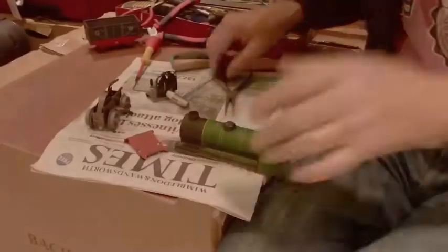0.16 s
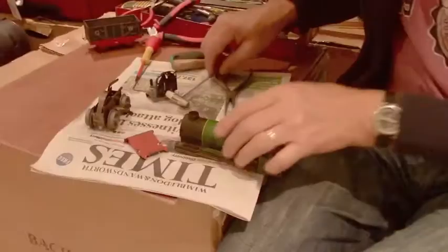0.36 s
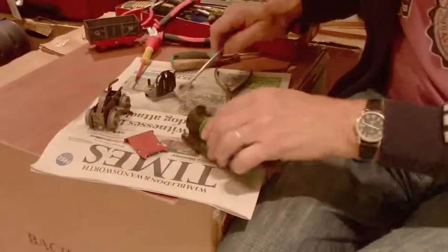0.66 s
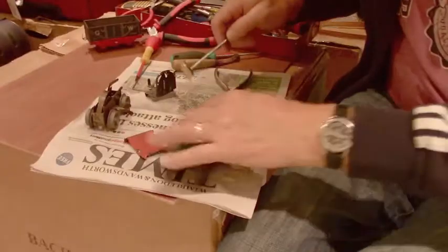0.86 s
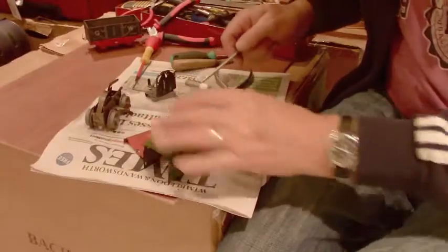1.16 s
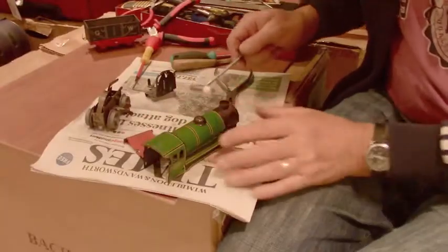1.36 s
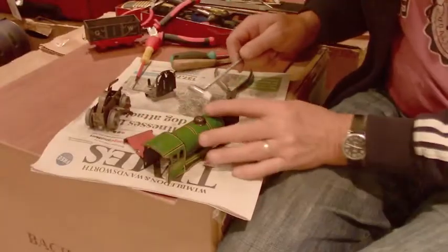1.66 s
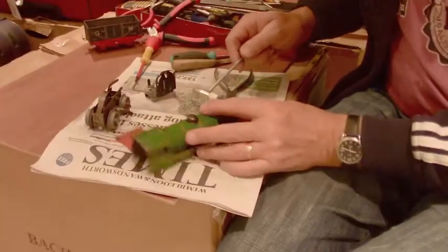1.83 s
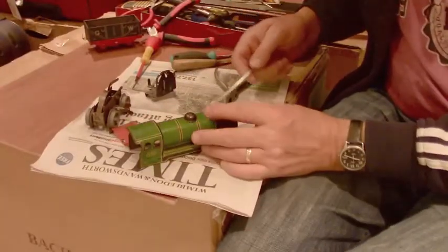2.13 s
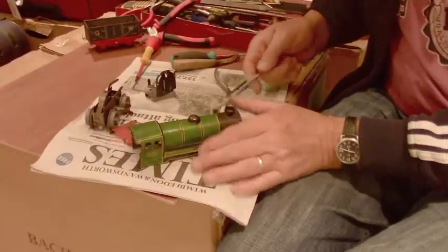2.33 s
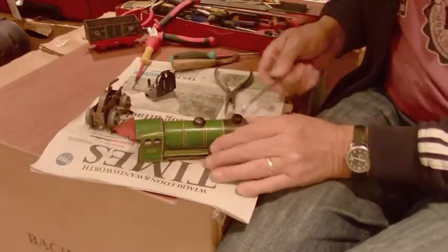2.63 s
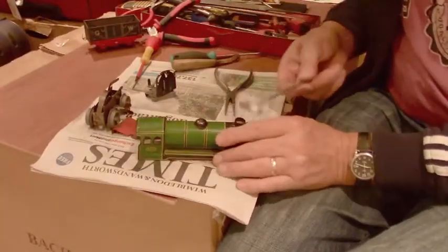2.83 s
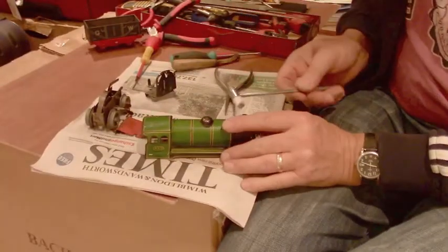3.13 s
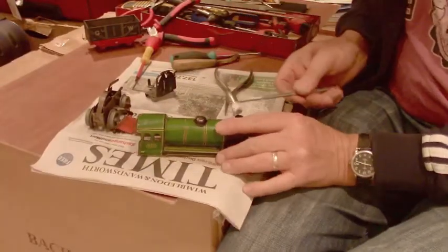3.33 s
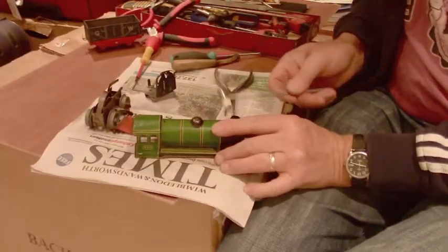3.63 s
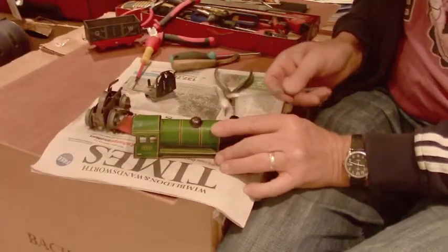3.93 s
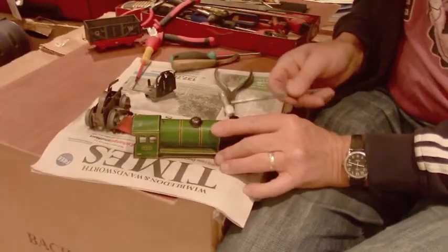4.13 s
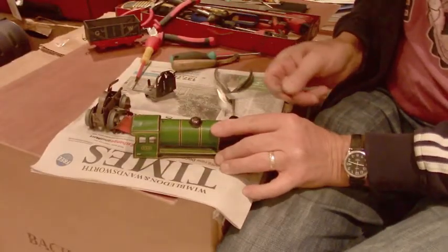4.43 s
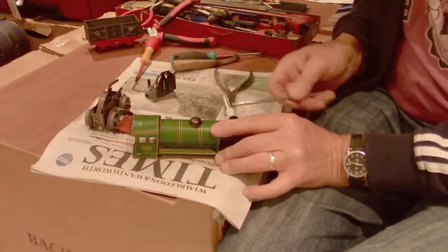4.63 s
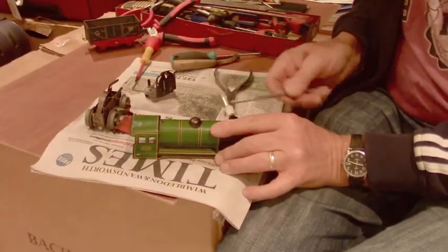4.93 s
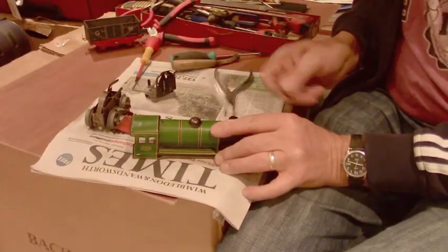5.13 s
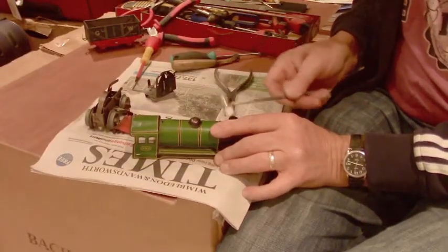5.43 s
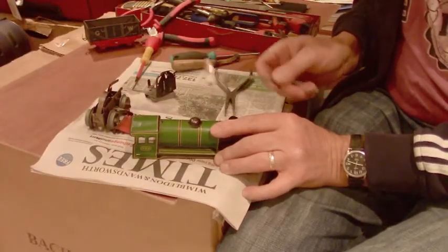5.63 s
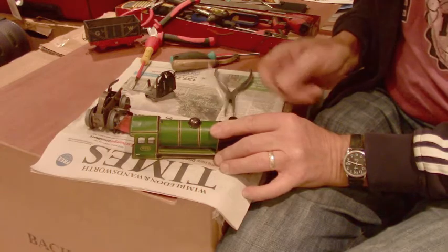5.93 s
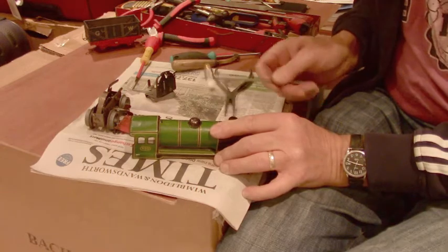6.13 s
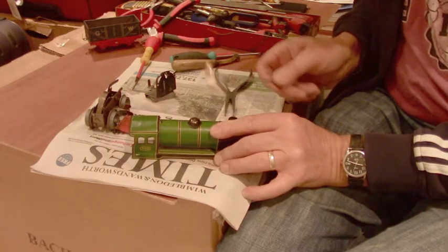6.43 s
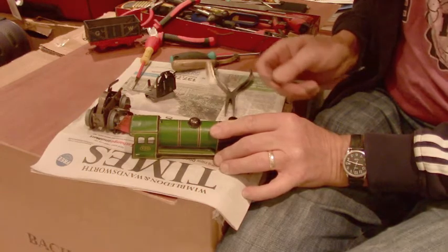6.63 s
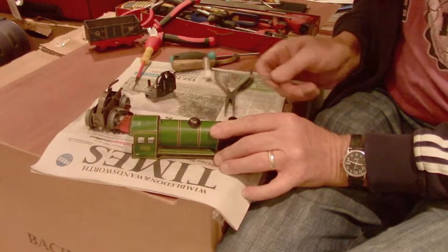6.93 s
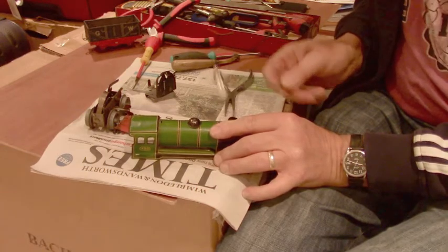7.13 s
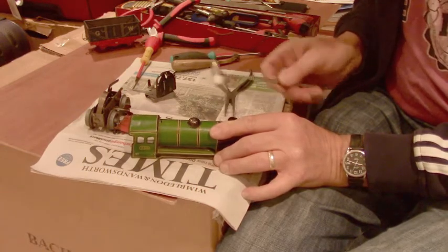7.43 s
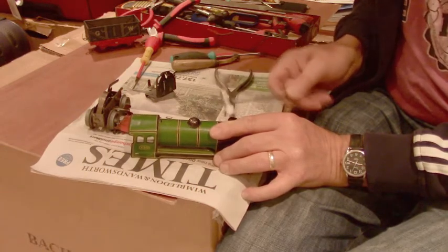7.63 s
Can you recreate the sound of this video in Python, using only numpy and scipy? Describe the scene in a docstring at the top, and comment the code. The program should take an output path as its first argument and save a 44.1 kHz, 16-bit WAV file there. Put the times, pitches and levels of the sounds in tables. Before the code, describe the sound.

Close up in a small, slightly echoing room, light metal clicks and short scrapes come from a tin toy being moved into place on newspaper. Then a small steel tool starts tapping it steadily, nearly four times a second, softly at first and then harder. The sharp taps ring briefly and thump the cardboard box underneath, with a few clanks from the toy and a low room noise behind.

```python
"""A dull room noise swells in, then light clicks and scrapes: a tin-plate toy locomotive is shifted,
turned and set down on a newspaper-covered cardboard box. A small steel tool rings faintly as it is
gripped, then taps the toy evenly, growing firmer. Each tap is a bright crack of the tin over a thump
of the box; now and then the toy drops back with a clank. A small, live room answers.
The sound is close and nearly the same in both channels, with the right one in opposite polarity."""
import sys
import numpy as np
from scipy import signal
from scipy.fft import rfft, irfft, next_fast_len
from scipy.io import wavfile
from scipy.ndimage import map_coordinates

SR = 44100
rng = np.random.default_rng(int(sys.argv[2]) if len(sys.argv) > 2 else 0)


def transcribe(u):
    """Save the signal u as a 16-bit wav file named by the first command-line argument.

    u: samples, shape (n,) or (channels, n), limited to [-1, 1]; the rate is SR.
    q: integer samples, one column per channel.
    """
    v = np.clip(np.atleast_2d(u).T, -1, 1)
    q = np.round(v * 32767).astype(np.int16)
    wavfile.write(sys.argv[1], SR, q)


N = 342657
HIT_TIME_S = np.arange(SR // 2) / SR  # time over the life of one hit


def amp(db):
    """Decibels to gain."""
    return 10 ** (np.asarray(db) / 20)


def unit(x):
    """x at rms 1."""
    return x / np.sqrt(np.mean(x ** 2) + 1e-20)


def along(points, hz):
    """Read a curve of (Hz, value) points on a log frequency axis."""
    freqs, values = np.transpose(points)
    return np.interp(np.log(hz + 1), np.log(freqs + 1), values)


def add(track, start_s, sound):
    """Mix a sound into a track."""
    part = track[round(start_s * SR):][:len(sound)]
    part += sound[:len(part)]


def filtered(x, response):
    """x times a response of frequency."""
    n = x.shape[-1]
    padded = next_fast_len(n + SR // 4)
    return irfft(rfft(x, padded) * response(np.fft.rfftfreq(padded, 1 / SR)), padded)[..., :n]


def low_cut(x, hz):
    """Roll off the bass below hz."""
    return signal.sosfilt(signal.butter(2, hz, "high", fs=SR, output="sos"), x)


def coloured(x, spectrum, bright_db=0, size=2048):
    """x through a minimum-phase EQ of unit energy, plus a treble shelf set by bright_db."""
    hz = np.fft.rfftfreq(size, 1 / SR)
    db = along(spectrum, hz)
    db -= 10 * np.log10(np.mean(amp(db) ** 2))
    db += bright_db * along([(3000, 0.1), (7000, 0.95)], hz)
    cepstrum = irfft(np.log(amp(db)))[:size // 2]
    cepstrum[1:] *= 2
    impulse_response = irfft(np.exp(rfft(cepstrum, size)))
    return signal.fftconvolve(x, impulse_response)[:len(x)]


# Tone of the room noise: freq_hz, level_db
ROOM_NOISE_EQ = [(20, -51), (50, -12), (105, -12), (170, -4.5), (260, -3), (335, -8), (450, -7.5),
                 (860, -8), (1100, -10), (1500, -22), (3000, -25.5), (5500, -28.5), (10000, -37.5),
                 (16000, -45)]
# Its fade-in: time_s, level_db
ROOM_NOISE_FADE = [(0, -50), (.04, -21.5), (.12, -6.5), (.25, 1.5), (.5, 4), (7.8, 3)]
def room_noise():
    """A dull room noise swells in and holds."""
    fade = amp(np.interp(np.arange(N) / SR, *np.transpose(ROOM_NOISE_FADE)))
    noise = filtered(rng.standard_normal(N), lambda hz: amp(along(ROOM_NOISE_EQ, hz)))
    return amp(-54) * fade * unit(noise)


def burst(t60_s):
    """Countless thin-plate modes die together: decaying noise of energy 1."""
    noise = rng.standard_normal(len(HIT_TIME_S)) * amp(-60 * HIT_TIME_S / t60_s)
    return noise / np.linalg.norm(noise)


def ring(modes, spread_db=0):
    """Metal rings in decaying modes; spread_db rebalances them at random on each hit."""
    t, out = HIT_TIME_S, np.zeros(len(HIT_TIME_S))
    for hz, db, t60_s in modes:
        envelope = amp(db + spread_db * rng.normal() - 60 * t / t60_s)
        out += envelope * np.sin(2 * np.pi * (hz * t + rng.random()))
    return out


# Light contacts of tool and tin: start_s, level_db, bright_db, pitch_hz
CLICKS = [(.4631, -24.5, 7.5, 3100), (.524, -34, -3, 2350), (.534, -9.5, -1, 1390),
          (1.7707, -7.5, 5.5, 3440), (1.8504, -6, 4, 3870), (1.9172, -15.5, 13, 4260),
          (1.9783, -13, -12, 2300), (2.042, -3.5, -1, 2600), (2.141, -17, 0, 5400), (2.27, -14, -7, 2470),
          (2.555, -2, 7.5, 1670), (2.6538, -4, -0.5, 3530), (2.751, -11, -23, 1700),
          (3.2725, -13, -17, 3440)]
# Tone of a contact: freq_hz, level_db
TICK_EQ = [(150, -4), (900, -4), (1600, 0.5), (2700, -3), (3700, 3), (4700, -17), (5800, -5), (7200, -16),
           (8400, -8), (11000, -23), (16000, -28)]
def clicks():
    """The tool touches hand-damped tin panels: a tick with a very short ring."""
    out = np.zeros(N)
    for start_s, db, bright_db, pitch_hz in CLICKS:
        panel = ring([(pitch_hz, -21, .035)])
        tick = coloured(burst(t60_s=.012), TICK_EQ, bright_db)
        add(out, start_s, amp(db + 2) * (tick + panel + amp(-6) * splash(TICK_EQ, bright_db)))
    return out


# Decay of the room: freq_hz, t60_s
REVERB_DECAY = [(100, 0.87), (350, 0.29), (1500, 0.51), (4000, 0.44), (8000, 0.42), (15000, 0.17)]
# Tone of its tail: freq_hz, level_db
REVERB_EQ = [(60, -46), (300, 5.5), (700, 0), (1500, -3), (3000, -3), (5000, -1), (6800, -4), (8200, -13.5),
             (11000, -2.5), (15000, 0)]
def reverb(x, build_s=0.002):
    """The diffuse answer of the room; the top end dies first."""
    hz, t, bands = signal.stft(rng.standard_normal(len(HIT_TIME_S)), SR, nperseg=256)
    decay = amp(-60 * t / along(REVERB_DECAY, hz)[:, None])
    tail = signal.istft(bands * decay * (1 - np.exp(-t / build_s)), SR, nperseg=256)[1]
    tail = filtered(tail / np.linalg.norm(tail), lambda f: amp(along(REVERB_EQ, f)))
    return signal.fftconvolve(x, tail)[:len(x)]


def splash(spectrum, bright_db):
    """Reverb of a hit: radiation in all directions evens out the shell's fine peaks and dips."""
    return reverb(coloured(signal.unit_impulse(len(HIT_TIME_S)), spectrum, bright_db))


# Pushes of the hand: start_s, rise_s, hold_s, level_db, move
STROKES = [(0.51, 0.017, 0.039, -33.5, "drag"), (0.686, 0.025, 0.032, -34, "drag"),
           (0.842, 0.024, 0.0098, -32, "drag"), (0.884, 0.056, 0.0069, -29.5, "drag"),
           (1.354, .012, 0.076, -56, "brush"), (1.557, 0.089, 0.11, -60.5, "brush"),
           (1.771, 0.061, 0.034, -32.5, "turn"), (1.898, 0.0098, 0.06, -47.5, "turn"),
           (2.142, 0.032, 0.087, -40.5, "slide"), (2.391, .03, 0.028, -39, "slide"),
           (2.545, .02, 0.088, -37, "slide"), (2.705, 0.016, 0.022, -42, "slide"),
           (2.919, 0.016, 0.065, -46, "slide"), (3.043, 0.01, 0.21, -56.5, "slide"),
           (3.26, 0.01, 0.04, -39, "drag")]
# How fast each move comes to rest: move, release_db_per_s
RELEASE_DB_PER_S = {"drag": 158, "turn": 185.5, "slide": 180, "brush": 200}
def pressure(move, waver_db=.8, waver_per_s=35):
    """Envelope of one kind of move: each push rises, holds unevenly and dies away."""
    t, envelope = np.arange(N) / SR, np.zeros(N)
    for start_s, rise_s, hold_s, db, kind in STROKES:
        if kind == move:
            attack = np.clip((t - start_s) / rise_s, 0, 1)
            released_s = np.maximum(t - start_s - rise_s - hold_s, 0)
            envelope = np.maximum(envelope, attack * amp(db - RELEASE_DB_PER_S[move] * released_s))
    waver = map_coordinates(rng.standard_normal(N // 100), [t * waver_per_s])
    return envelope * amp(waver_db * waver)


def gripped_shell(modes, hz):
    """Response of the shell under one grip: fingers shift each mode's pitch and level."""
    centre, width, db = np.transpose(modes)[:, :, None]
    centre = centre * (1 + .028 * rng.standard_normal(centre.shape))
    db = db + 4 * rng.standard_normal(db.shape)
    return np.sum(amp(db) * 1j * hz * width / (centre ** 2 - hz ** 2 + 1j * hz * width), axis=0)


def glints(force, per_s=320, low_hz=4500, high_hz=11200, t60_s=.04, spread_db=4):
    """Here and there an edge catches hard and lets go with a tiny, high ping."""
    out, t = np.zeros(len(force)), np.arange(SR // 10) / SR
    count = int(per_s * len(force) / SR)
    for when, pitch, strength in rng.random((2000, 3))[:count]:
        at = int(when * len(force))
        hz = low_hz * (high_hz / low_hz) ** pitch
        db = -14 + spread_db * (2 * strength - 1)
        add(out, at / SR, force[at] * amp(db - 60 * t / t60_s) * np.sin(2 * np.pi * hz * t))
    return out


def scrape(move, modes, rasp_db, bright_db, glint_db, slips_per_s=2200, grip_samples=4096):
    """Tin edges catch and slip at random; the slips rasp and ring the shell under a changing grip."""
    force, hop = pressure(move), grip_samples // 2
    start, stop = np.flatnonzero(force > amp(-80))[[0, -1]] + [-hop, SR // 2]  # room for the tail
    force = force[start:stop]
    slips = (rng.random(N) < slips_per_s / SR) * rng.uniform(-1, 1, N)
    friction = (slips + .06 * rng.standard_normal(N))[start:stop]
    shell, out = np.zeros(len(force)), np.zeros(N)
    for at in range(0, len(force) - grip_samples, hop):  # crossfade from grip to grip
        piece = filtered(friction[at:at + grip_samples], lambda hz: gripped_shell(modes, hz))
        add(shell, at / SR, unit(piece) * np.sqrt(np.hanning(grip_samples)))
    rasp = amp(rasp_db) * unit(coloured(friction, RASP_EQ, bright_db))
    sound = force * (shell + rasp) / np.hypot(1, amp(rasp_db)) + amp(glint_db) * glints(force)
    add(out, start / SR, sound + amp(-3) * reverb(sound))
    return out


# Resonances of the tin when dragged, turned and slid: pitch_hz, width_hz, level_db
DRAG_MODES = [(1200, 30, -5), (1400, 60, -6), (1690, 50, -7), (2330, 70, 0), (2750, 70, -4), (3120, 50, -1),
              (3550, 50, 0), (4200, 35, 1), (4400, 50, -3), (5190, 50, -2), (5900, 100, -7), (6440, 50, -7),
              (8020, 70, -7), (8800, 140, -8)]
TURN_MODES = [(1180, 28, -4), (1750, 40, -6), (2060, 60, 0), (3150, 80, -6), (3850, 60, 1), (4120, 60, 0),
              (5200, 50, -4), (5700, 50, -5), (8020, 90, 0), (8730, 120, -1), (9980, 50, -7),
              (11000, 50, -9)]
SLIDE_MODES = [(1190, 30, -5), (1680, 40, -1), (2200, 45, 1), (2350, 50, 3), (2520, 70, -2),
               (3050, 150, -7), (3610, 60, -5), (5420, 140, -13), (6430, 70, -13), (8360, 80, -15)]
# Tone of the rasp in all three moves: freq_hz, level_db
RASP_EQ = [(200, 2), (900, -30), (1500, 2), (2400, 6), (4200, -2.5), (6800, -7.5), (9000, -2),
           (12000, -16.5), (16000, -44.5)]
def toy_moves():
    """The toy is dragged, turned and slid into place; each hold lets different modes ring."""
    drag = amp(-6) * scrape("drag", DRAG_MODES, rasp_db=-4, bright_db=6, glint_db=-7)
    turn = amp(1.5) * scrape("turn", TURN_MODES, rasp_db=-5, bright_db=-2, glint_db=6)
    slide = amp(-2.5) * scrape("slide", SLIDE_MODES, rasp_db=-13.5, bright_db=9, glint_db=3.5)
    return drag + turn + slide


# Tone of rubbed newspaper: freq_hz, level_db
PAPER_EQ = [(500, -18), (2000, -0.5), (4500, -3), (6500, -4), (9500, -3.5), (11500, -15), (16000, -17)]
def paper_brush():
    """A hand brushes the newspaper: a soft hiss that follows its pressure."""
    return pressure("brush") * unit(coloured(rng.standard_normal(N), PAPER_EQ))


# The toy lands on the box: start_s, level_db, knock_db
DROPS = [(1.978, -9, -20), (2.339, -27, -38), (4.669, -12, -26), (5.4745, 0, -10.5), (7.0864, -4, -12.5),
         (7.3265, -1.5, -2.5)]
# Tone of a landing: freq_hz, level_db
CLANK_EQ = [(40, -54), (200, -15), (380, 9), (600, -0.5), (1000, 4), (1500, 9), (2300, -1.5), (4000, -1),
            (9000, -16.5), (16000, -28)]
def toy_drops():
    """The toy is set down or drops back: the tin clanks and the box thumps softly under it."""
    out, box = np.zeros(N), box_thump()
    for start_s, db, knock_db in DROPS:
        impact = signal.unit_impulse(len(HIT_TIME_S)) + 1.6 * burst(t60_s=0.0076)
        clank = amp(db + 1) * coloured(impact, CLANK_EQ) + shell_knock(knock_db)
        room = reflections(clank, bass=False) + reverb(clank)
        add(out, start_s, clank + room + amp(db - 11) * box)
    return out


def thump(hz, swell_s):
    """A surface gives and springs back for a few cycles at most."""
    swell = (HIT_TIME_S / swell_s) ** 2
    return swell * np.exp(1 - swell) * np.sin(2 * np.pi * hz * HIT_TIME_S)


def shell_knock(db):
    """The short, hollow knock of the whole shell."""
    return amp(db - 5) * thump(hz=674, swell_s=0.0013)


# Standing waves of the room: pitch_hz, level_db
ROOM_MODES = [(75, -20.5), (95, -20.5), (118, -7.5), (136, -5), (176, -4), (219, 1.5), (243, 1.5),
              (287, -3.5), (318, 0.5), (350, 3.5), (380, 5), (402, 3), (442, -1.5), (509, -0.5), (550, -1)]
def box_thump(room_t60_s=0.49, room_build_s=0.022):
    """The cardboard flexes once, echoes off the walls and wakes the room's standing waves."""
    t = HIT_TIME_S
    push = thump(hz=304.6, swell_s=0.0041) + amp(-16.5) * thump(hz=119.7, swell_s=0.0041)
    waves = sum(amp(db) * np.sin(2 * np.pi * hz * t) for hz, db in ROOM_MODES)
    bloom = amp(-60 * t / room_t60_s) * (1 - np.exp(-(t / room_build_s) ** 2))
    return 0.6 * (push + reflections(push, bass=True)) + amp(-31) * waves * bloom


# Echoes from nearby surfaces: delay_ms, bass_db, treble_db
WALLS = [(4.7, -11, -3), (8.85, -5, -14), (10.65, -5, -16), (18.5, -14, -19), (21.3, -15, -20),
         (31.5, -6.5, -21), (37.25, -14, -20), (45.3, -12.5, -22), (57.5, -17, -26)]
def reflections(x, bass):
    """Early reflections of x, at the walls' bass or treble levels."""
    out = np.zeros(len(x))
    for delay_ms, bass_db, treble_db in WALLS:
        add(out, delay_ms / 1000, x * amp(bass_db if bass else treble_db))
    return out


# Ring of the steel tool: pitch_hz, level_db, t60_s
TOOL_MODES = [(4140, -14, .45), (5157, 0, .22), (5486, -5, .4), (9302, -8, .17), (10350, -7, .15),
              (11500, -9, .12)]
def tool_ring(start_s=3.312, attack_s=.008):
    """The tool rings faintly as it is gripped; the rubbed steel takes a moment to sing."""
    out = np.zeros(N)
    add(out, start_s, amp(-41.5) * ring(TOOL_MODES) * (1 - np.exp(-HIT_TIME_S / attack_s)))
    return out


# Tone of the struck tin: freq_hz, level_db
CRACK_EQ = [(40, -36.5), (200, -5), (600, -11), (950, -6.5), (1450, 2.5), (2200, -3.5), (3000, -0.5),
            (4000, -4.5), (4900, -11.5), (6600, -6), (7350, -8), (8100, 0), (9400, -7), (11500, -17),
            (15000, -20)]
def crack(bright_db):
    """What the struck tin sends out in one direction: a sharp crack and a short clatter."""
    snap = amp(13.5) * burst(t60_s=0.02)
    clatter = amp(-4.5) * burst(t60_s=0.08)
    return coloured(snap + clatter, CRACK_EQ, bright_db)


# Taps of the tool, each on a brighter or duller spot: start_s, level_db, bright_db
TAPS = [(3.5791, -13, 1), (3.8592, -14.5, -0.5), (4.1098, -10.5, -4.5), (4.3695, -6, -2),
        (4.6364, -4, -1.5), (4.906, -4, 1), (5.1695, -3.5, 3), (5.431, -1.5, 3.5), (5.7054, 0, -0.5),
        (5.9802, -.5, 0.5), (6.2396, -.5, 4), (6.5092, 0, 2), (6.779, 0, 1.5), (7.048, 1, 0),
        (7.3198, -2.5, 5.5), (7.6063, 0, 2)]
# Ring of the struck shell: pitch_hz, level_db, t60_s
SHELL_MODES = [(1186, -1, .35), (1298, -1, .35), (1401, 0, .35), (1503, -2, .35), (1562, 0, .35),
               (1770, -3, .3), (1970, -5, .3), (2350, -5, .25), (2819, 0, .2), (3163, 0, .2),
               (3505, -2, .3), (3940, -3, .3), (6730, -7, .2), (8030, -2, .12), (8730, -5, .12),
               (10150, -8, .1)]
def taps():
    """The tool cracks on the tin, the shell knocks and rings, and the box thumps under it."""
    out, box = np.zeros(N), box_thump()
    for start_s, db, bright_db in TAPS:
        # a brighter spot cracks less in the mids and knocks more
        crack_db = db - 1.3 - 0.65 * bright_db
        knock = shell_knock(db - 8 + 0.74 * bright_db)
        shell = amp(-30.5) * ring(SHELL_MODES, spread_db=3)
        room = reflections(crack(bright_db), bass=False) + amp(13) * splash(CRACK_EQ, bright_db)
        add(out, start_s, amp(crack_db) * (crack(bright_db) + shell + room))
        reverb_send = amp(db - 13) * thump(hz=383.5, swell_s=0.0042) + knock
        add(out, start_s - .0005, amp(db) * box + knock + reverb(reverb_send))
    return out


# A very faint left-right difference around taps and drops, mostly deep bass and top treble:
# freq_hz, side_db
SIDE_EQ = [(25, -4), (70, -5), (150, -61), (500, -37.5), (2000, -38), (5000, -77), (16000, -27)]
def scene():
    """Mid/side mix, with a faint left-right difference in the room noise and around taps and drops."""
    hits = low_cut(taps() + toy_drops(), hz=55)
    handling = low_cut(clicks() + tool_ring() + toy_moves(), hz=250)
    mid = hits + handling + paper_brush() + room_noise()
    side = filtered(reverb(hits), lambda hz: amp(along(SIDE_EQ, hz))) + amp(-19) * room_noise()
    return np.array([mid + side, mid - side]) * amp([[.17], [-.17]])


def record(dry, ceiling=.95, top_hz=15750):
    """A soft clip rounds off the loudest peaks; a steep high cut limits the band."""
    rounded = dry / (1 + np.abs(dry / ceiling) ** 6) ** (1 / 6)
    return filtered(rounded, lambda hz: 1 / (1 + (hz / top_hz) ** 120))


dry = scene()
out = record(dry)
transcribe(out)
```